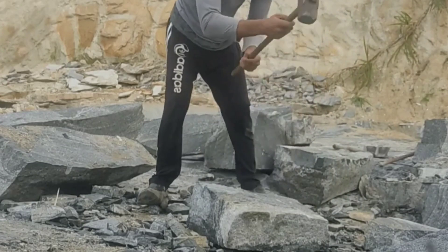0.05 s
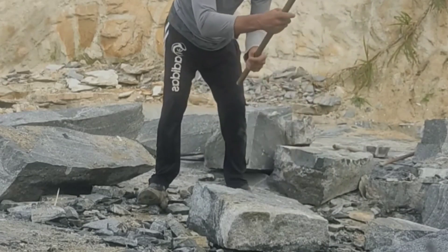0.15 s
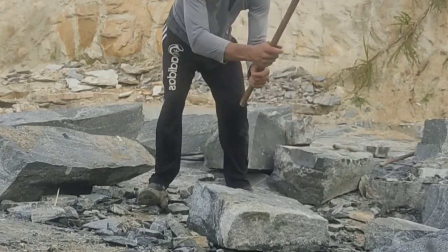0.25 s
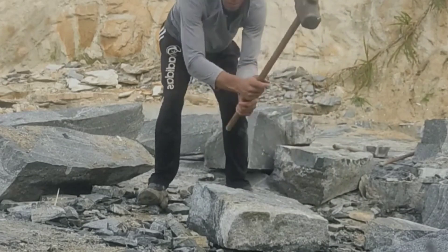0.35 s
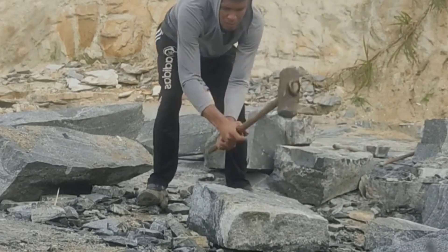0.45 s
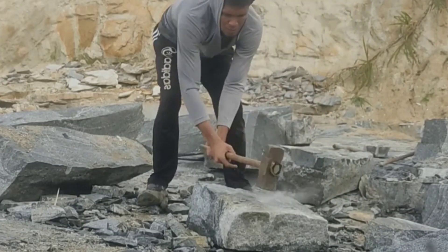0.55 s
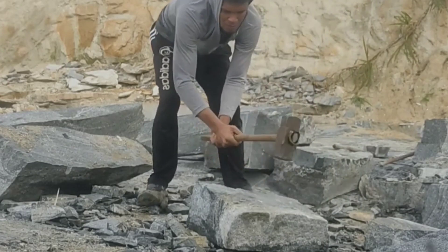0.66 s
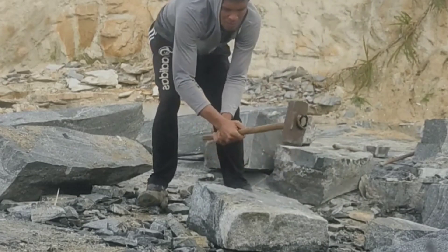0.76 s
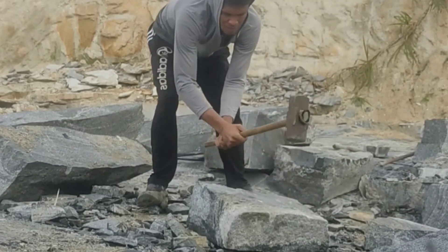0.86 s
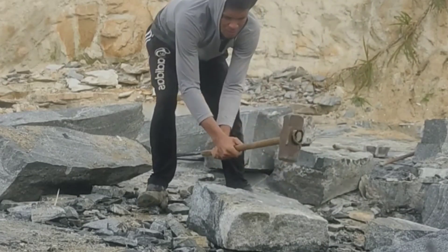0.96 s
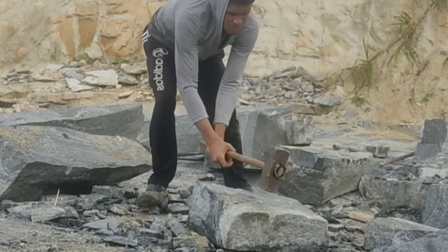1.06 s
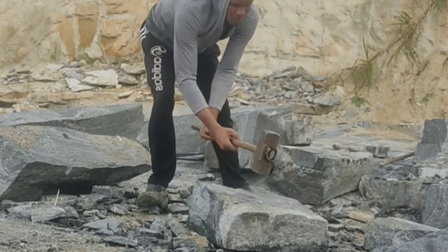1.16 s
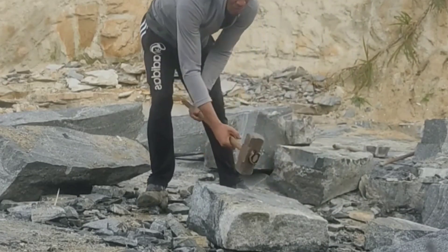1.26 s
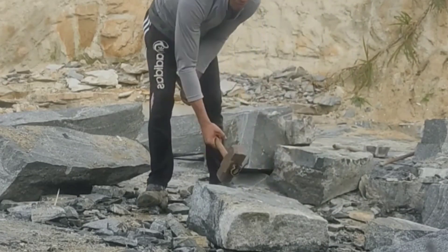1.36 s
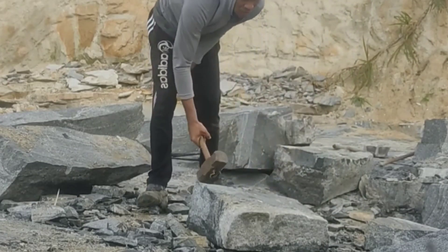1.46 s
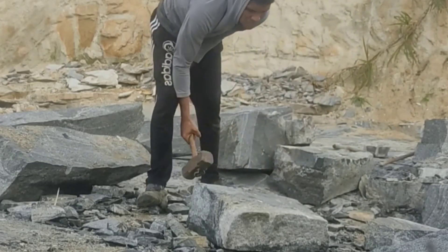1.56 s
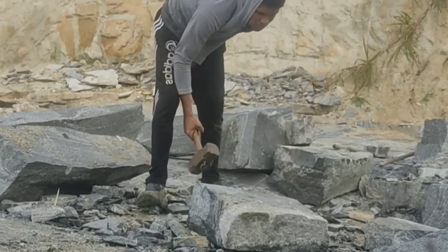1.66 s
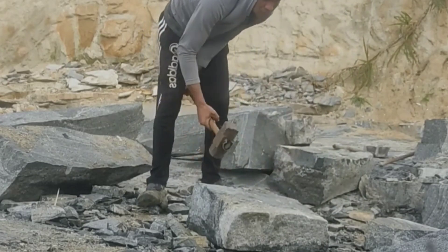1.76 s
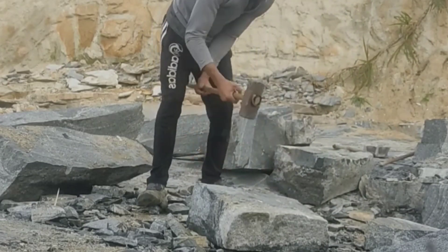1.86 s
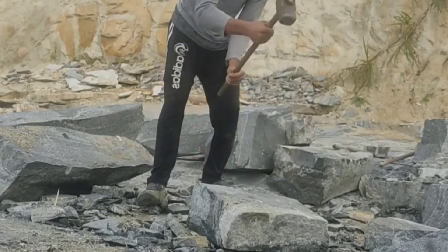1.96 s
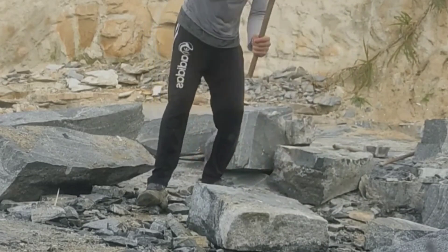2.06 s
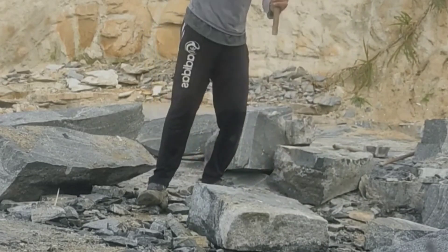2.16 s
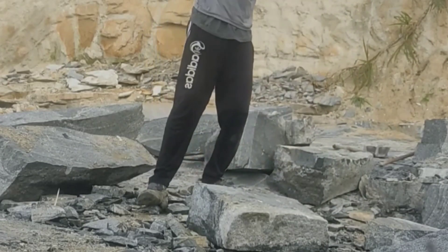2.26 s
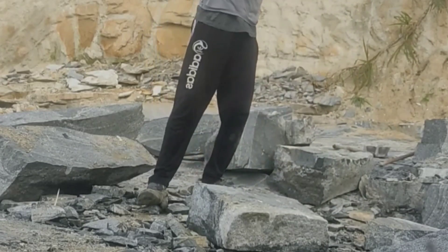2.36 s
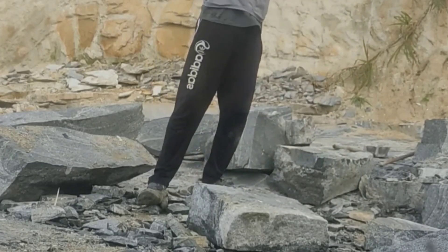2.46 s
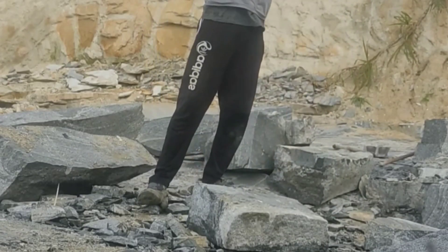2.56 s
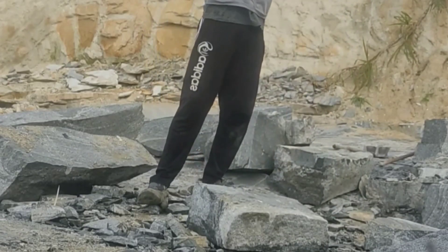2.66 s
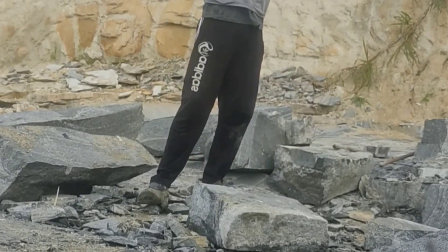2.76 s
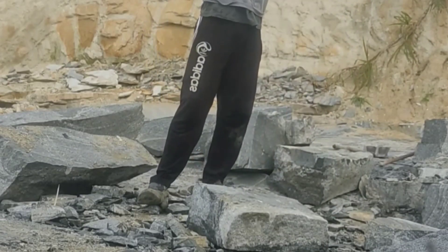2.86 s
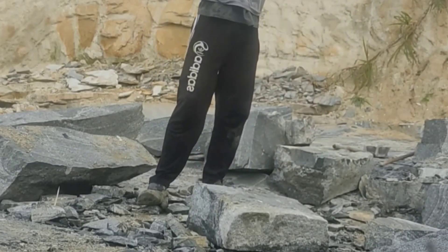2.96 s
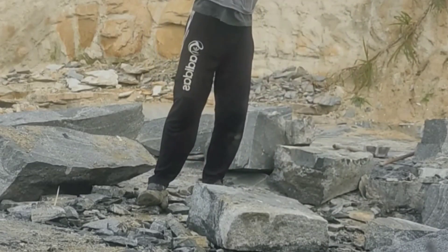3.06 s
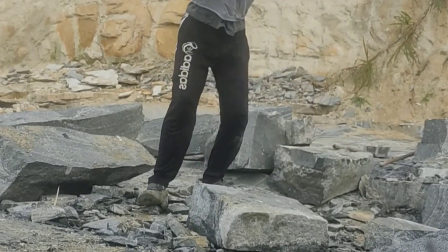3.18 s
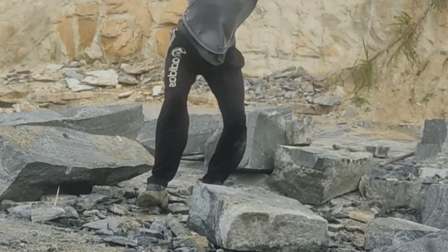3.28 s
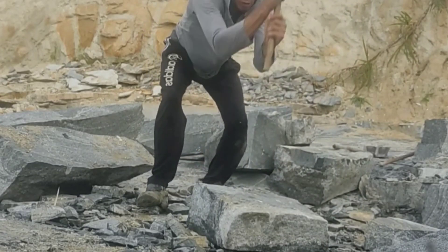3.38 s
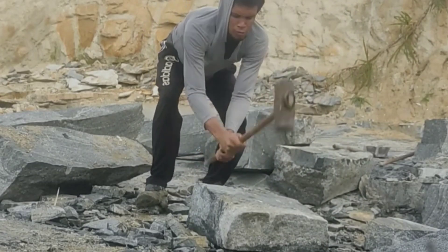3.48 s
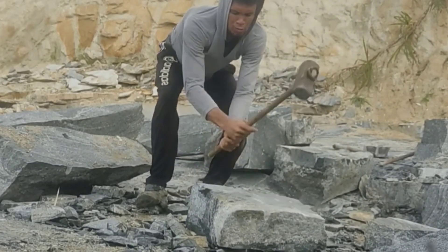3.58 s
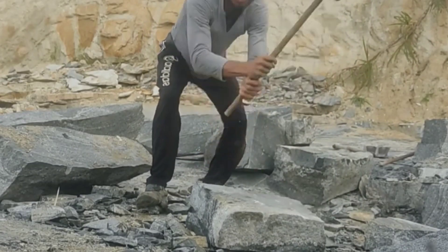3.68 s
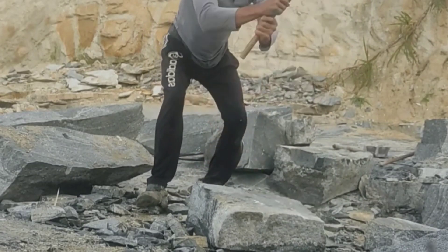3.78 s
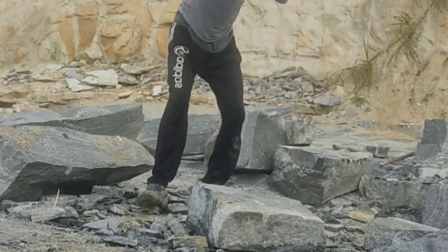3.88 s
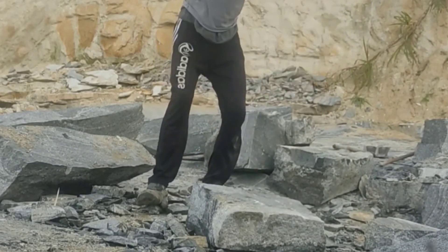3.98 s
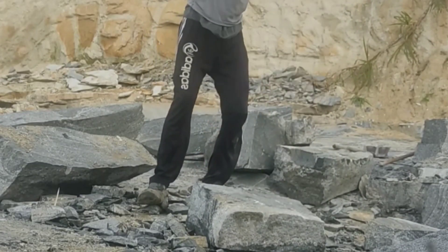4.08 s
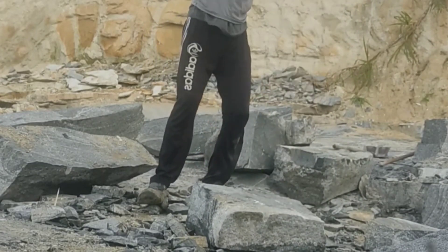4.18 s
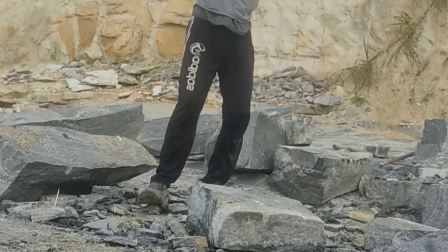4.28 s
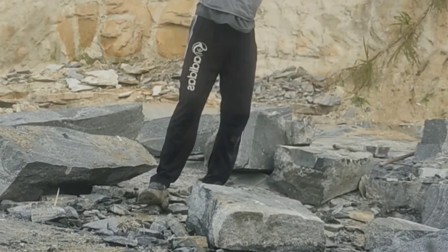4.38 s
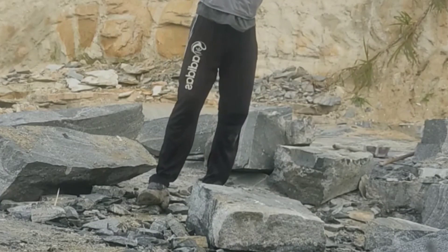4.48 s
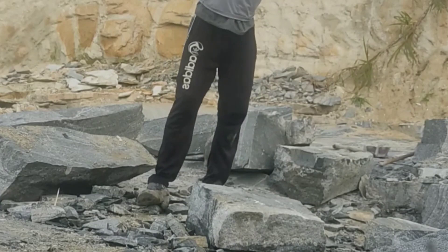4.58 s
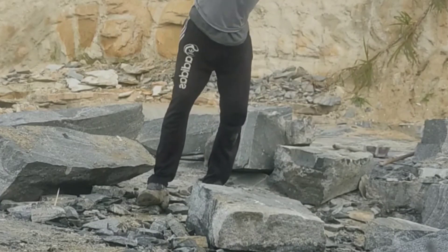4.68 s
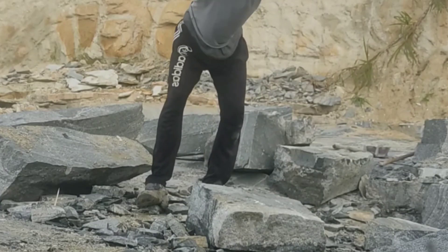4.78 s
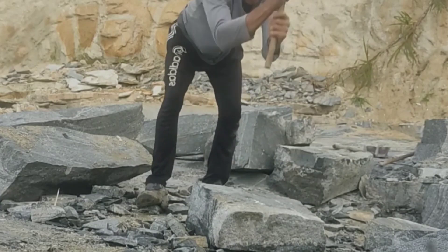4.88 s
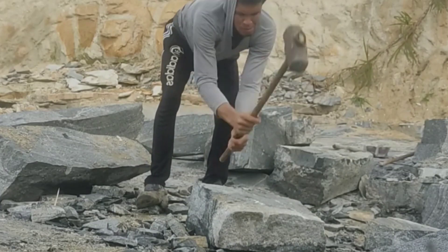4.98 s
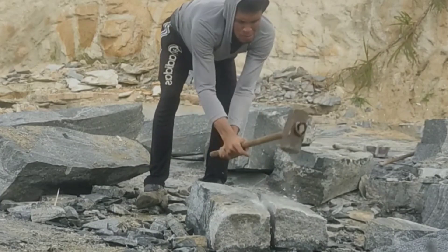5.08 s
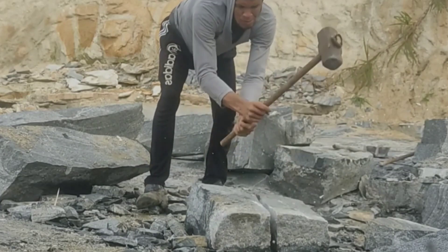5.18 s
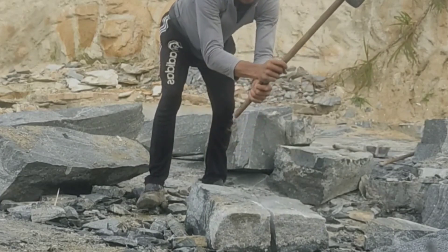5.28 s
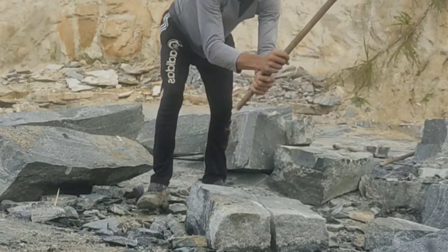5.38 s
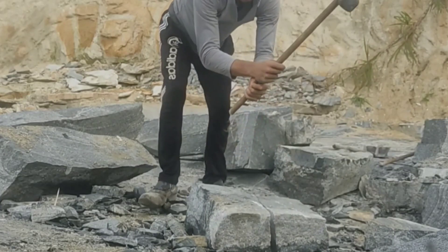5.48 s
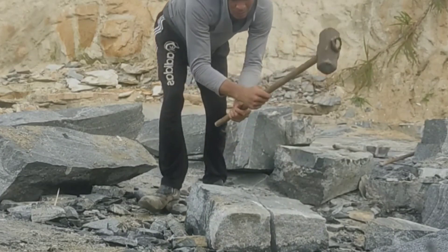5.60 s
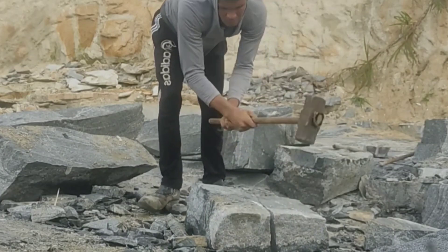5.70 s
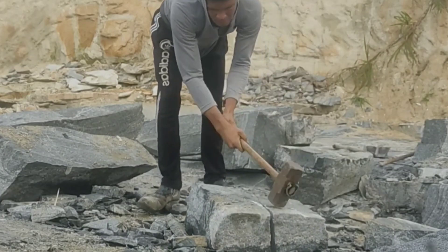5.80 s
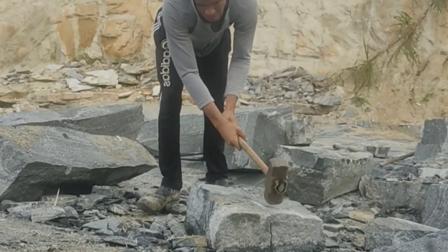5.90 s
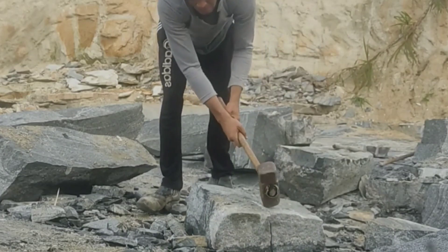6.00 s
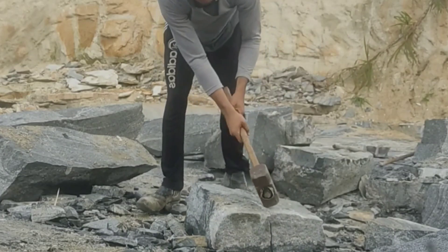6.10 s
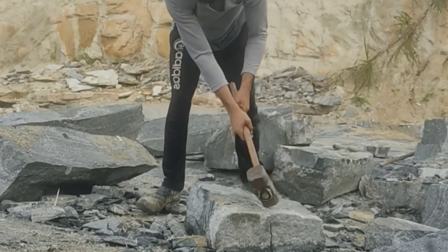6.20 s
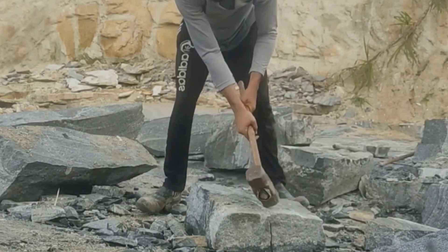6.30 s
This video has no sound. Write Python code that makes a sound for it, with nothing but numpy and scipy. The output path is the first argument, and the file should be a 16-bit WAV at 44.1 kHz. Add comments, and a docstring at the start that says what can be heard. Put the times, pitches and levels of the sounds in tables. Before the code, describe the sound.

Low gusts thump the left side of a stereo microphone while boots grind grit. Two stone blows come half a second apart, the second ringing more, followed by scuffing and a quieter wait. A sharp third blow has a faint bounce and scattering chips. After another pause the fourth rings brightest with steel, then a duller, higher-thudding fifth lands, with a faint thud after. Open quarry, short rock echoes, soft distant birds.

```python
"""A sledgehammer strikes a stone block five times in an open quarry, with two faint following thuds; the block splits.
Each blow sums shaped noise in five registers, decaying modes of block and steel head, and echoes off the rocks.
Chips are short clinks and ticks; boots, clothes and crumbs are grainy noise under slow envelopes.
Wind is low noise, strongest at the left microphone port; the right port hears more treble.
Small far birds are gliding sines blurred by many paths, over a steady air noise."""
import sys
import numpy as np
from scipy import signal
from scipy.fft import rfft, irfft, next_fast_len
from scipy.io import wavfile
from scipy.ndimage import uniform_filter1d

SR = 44100
rng = np.random.default_rng(int(sys.argv[2]) if len(sys.argv) > 2 else 0)


def wav_out(sig):
    """Save sig, one row per channel (or a flat mono array), as 16-bit PCM at SR to the path in sys.argv[1]."""
    wavfile.write(sys.argv[1], SR, np.round(np.clip(np.atleast_2d(sig).T, -1, 1) * 32767).astype(np.int16))


N = 279717

# Event levels are before the trims in the functions. Colours are spectra: each row is Hz, relative dB per Hz.

# Still air. Colour: Hz, dB per Hz.
AIR_COLOUR = [(180, -31.5), (300, -2), (447, -1), (511, -9.5), (814, -5.5), (978, -13.5), (2440, -14.5),
              (2880, -22.5), (5520, -22), (7320, -9), (10600, -27.5), (12300, -32), (16000, -47.5)]
AIR_DB = -70

# Light breeze between gusts. Each row: time in seconds, level in dB.
BREEZE_CURVE = [(0.0, -31.5), (0.12, -51), (0.26, -30), (0.65, -39), (1.16, -40), (1.52, -56),
                (2.61, -39.5), (2.88, -59.5), (5.98, -57.5), (6.34, -71.5)]
BREEZE_TRIM_DB = -2.5
# Gusts. Each row: peak time in seconds, half-length in seconds, level in dB.
GUST_EVENTS = [(0.101, 0.04, -14), (0.218, 0.068, -16.5), (0.464, 0.051, -24), (0.718, 0.041, -33),
               (0.91, 0.085, -30), (1.003, 0.036, -17.5), (1.092, 0.011, -12.5), (1.287, 0.086, -38),
               (1.706, 0.015, -39), (1.81, 0.055, -32.5), (1.97, 0.011, -42), (2.044, 0.015, -36.5),
               (2.234, 0.092, -48.5), (2.447, 0.041, -31), (2.615, 0.023, -33), (2.771, 0.048, -39.5),
               (3.02, 0.059, -55.5), (3.316, 0.012, -39), (3.482, .035, -41.5), (3.797, 0.038, -38.5),
               (3.913, 0.0093, -45), (4.017, 0.013, -43), (4.13, .025, -50.5), (4.372, 0.049, -38.5),
               (4.496, 0.036, -45), (4.59, 0.028, -36.5), (4.96, 0.026, -52.5), (5.072, 0.014, -36),
               (5.402, 0.022, -48.5), (5.586, 0.018, -35), (5.667, 0.012, -34.5)]
GUST_RISE_RATIO, GUST_FALL_RATIO = 0.85, 1.2  # of the half-length
# Sudden eddies. Each row: start in seconds, thump level in dB, flutter level in dB.
EDDY_EVENTS = [(0.069, -4, -22.5), (0.085, -16.5, -10), (0.122, -21, -31), (0.157, -2.5, -22),
               (0.212, -9, -18), (0.249, -5, -30), (0.371, -11.5, -31), (0.429, -11, -40.5),
               (0.563, -15, -59), (0.887, -8.5, -34), (0.919, -12.5, -34), (0.955, -10, -38),
               (1.007, -4, -19), (1.066, -8.5, -16.5), (1.765, -22.5, -46), (2.433, -16, -51),
               (2.46, -22.5, -58.5), (2.608, -17.5, -46), (2.756, -23.5, -65), (4.572, -33.5, -66),
               (5.037, -29, -65.5)]
# Buffeting. Colour: Hz, dB per Hz.
BUFFET_COLOUR = [(90, -7), (130, -1.5), (170, 8), (260, -3.5), (380, -15), (600, -35.5), (1200, -46)]
BUFFET_LOW_HZ, RUMBLE_LOW_HZ = 105, 18
# Deep rumble, eddy thump and eddy flutter. Colours: Hz, dB per Hz.
RUMBLE_COLOUR = [(15, 3), (35, 0.5), (60, 2.5), (110, -5.5)]
THUMP_COLOUR = [(60, -5), (170, 0), (300, -2), (450, -15)]
FLUTTER_COLOUR = [(400, 11.5), (800, -4), (1500, -24.5), (3000, -47)]
# The rumble follows the buffeting sluggishly, with a smaller swing.
RUMBLE_DB, RUMBLE_FOLLOW_RATIO, RUMBLE_BLUR_S = -15, 0.53, 0.071
# Wind with the right port in the lee. Each row: Hz, left minus right in dB.
LEE_BALANCE = [(25, 7), (60, 14), (150, 17), (400, 18), (1300, 25)]

# Port balance for everything but wind. Each row: Hz, left minus right in dB.
PORT_BALANCE = [(100, 11), (400, 2), (1200, 4), (2400, 2), (4200, 2.5), (5400, -7), (6500, -16.5),
                (7800, -19), (10000, -13.5), (15000, -6.5)]
# Port phase: block nearer the right port, delay bent by the microphone body.
# Each row: Hz, left lead in radians.
PORT_PHASE_CURVE = [(100, 0.8), (650, -0.61), (1200, -1.24), (2100, -0.96), (2750, -0.96), (3500, -2),
                    (6500, -3.5), (9000, -1)]

# Far birds. Each row: start in seconds, length in seconds, start Hz, end Hz, arch in Hz, level in dB.
BIRD_CALLS = [(1.96, 0.17, 1460, 1690, 258, -58), (3.982, 0.06, 2587, 2620, 62, -54.5),
              (4.415, 0.1, 8370, 6710, -0.5, -64.5), (4.696, 0.07, 6700, 8200, -2.5, -54),
              (5.524, 0.079, 2480, 2520, 84, -52), (5.771, 0.04, 2420, 2610, 91, -53.5),
              (6.05, 0.054, 2350, 2540, 80, -55.5), (6.168, 0.031, 2350, 2590, 63.5, -63)]

# Scraping and hissing. Colours: Hz, dB per Hz.
SCRAPE_COLOUR = [(240, -38), (400, -4), (474, -3), (1040, -6.5), (1150, -7), (1490, -10), (5010, -12.5),
                 (6000, -14.5), (7800, -41.5), (13200, -120)]
HISS_COLOUR = [(2650, -42.5), (4500, -9.5), (5530, -8.5), (7370, 0.5), (10000, -22), (14500, -29),
               (15500, -42.5), (16000, -65)]
# Clothes rustling through the work. Each row: time in seconds, level in dB.
RUSTLE_CURVE = [(0.0, -66.5), (0.37, -59.5), (1.16, -64), (1.39, -57), (2.42, -70), (3.64, -67),
                (3.78, -56.5), (4.26, -74), (5.14, -73.5), (5.28, -65), (5.9, -62), (6.34, -76.5)]
RUSTLE_SCRAPE_TRIM_DB, RUSTLE_HISS_TRIM_DB = 0.5, 1
# Scuffs of boots, sleeves and hammer head. Each row: peak time in seconds, half-length in seconds,
# scrape level in dB, hiss level in dB, top edge of the scrape in Hz.
SCUFF_EVENTS = [(0.033, .015, -51.5, -55, 4985), (0.114, .06, -33.5, -37.5, 4670),
                (0.228, .04, -39.5, -45.5, 5000), (0.359, 0.017, -57, -53, 4840),
                (0.96, .02, -60, -60, 4930), (1.084, .018, -55, -73, 4030), (1.437, .022, -41.5, -46, 6500),
                (1.505, .06, -41, -42.5, 5170), (1.77, .02, -47, -94, 2270),
                (1.825, .018, -36.5, -81, 2200), (1.879, .02, -39.5, -53, 5220),
                (1.914, .014, -41.5, -58, 4500), (2.331, .025, -47.5, -63.5, 3560),
                (2.6, 0.052, -61.5, -87, 4970), (2.731, 0.052, -62, -72, 5000),
                (3.425, .035, -73, -66.5, 5000), (3.566, .025, -61, -60, 4930),
                (4.14, .03, -63, -71.5, 5000), (5.386, .03, -65, -59, 5000), (5.649, .04, -46, -50, 4000),
                (5.722, .018, -52.5, -61, 2000), (5.866, .04, -62, -68.5, 5050)]
SCUFF_RISE_RATIO, SCUFF_FALL_RATIO = 0.92, 1.22  # of the half-length
SIZZLE_DB = -14  # highest treble of a scuff against its hiss
GRIT_PER_S, GRIT_SPREAD_DB = 410, 3.6
# Stone crumbs underfoot: rate, level against the rustle, spread of sizes, decay.
CRUMBS_PER_S, CRUMB_DB, CRUMB_SPREAD_DB, CRUMB_T60_S = 31, 2, 4, 0.05

# Stone chips landing or shifting. Each row: start in seconds, clink level in dB, tick level in dB.
CHIP_EVENTS = [(0.029, -53, -43.5), (0.352, -63, -47), (0.366, -62, -50), (0.538, -59, -50),
               (0.575, -76, -50.5), (0.7685, -46, -47.5), (1.8837, -55, -42), (2.293, -52.5, -57.5),
               (2.8148, -53, -37.5), (3.132, -57.5, -61), (3.1822, -62.5, -46), (3.403, -60, -48.5),
               (3.8088, -43, -34.5), (3.841, -44.5, -47), (3.923, -41.5, -42), (3.946, -71, -46.5),
               (3.978, -63, -43.5), (4.131, -58, -48), (5.093, -59.5, -60.5), (5.4283, -75, -39.5),
               (6.11, -60.5, -54.5)]

# Hammer blows and faint following thuds. Each row: start in seconds, thud, knock, clack, crack and spit levels
# in dB, length in seconds, first snap in dB, echo in dB, pitch ratio, left minus right in dB,
# ring of the block in dB, ring of the head in dB.
BLOW_EVENTS = [(0.6368, -17.5, -18.5, -20.5, -16.5, -24.5, 0.017, 8, -28.5, 1.015, 2.5, 1, -9),
               (1.1594, -18.5, -19, -24, -29.5, -44.5, 0.016, -3.5, -28, 1.025, -0.5, 13.5, 3.5),
               (3.6203, -16, -18.5, -13, -21.5, -30, 0.017, 4.5, -23, 0.98, -2.5, 2.5, 0.5),
               (3.714, -34.5, -42, -61, -49.5, -70, 0.019, -11, -32, 1.01, -5, -8.5, -6.5),
               (5.1515, -15.5, -18.5, -15.5, -24.5, -31, 0.018, 1, -22, 1.005, 1, 10, 9.5),
               (5.9052, -17.5, -19.5, -29.5, -22, -39.5, 0.019, 5, -29.5, 1.25, 0, 0.5, -3.5),
               (6.036, -32.5, -44, -56, -51, -73, 0.014, -23.5, -27, 1.15, 1, 2, 9.5)]
# Edges of the five registers thud, knock, clack, crack, spit, in Hz.
REGISTER_EDGES_HZ = [130, 950, 2200, 5400, 10000, 17000]
# Impact noise. Colour: Hz, dB per Hz.
CLACK_COLOUR = [(130, -5.5), (240, -8.5), (340, 3), (820, -4.5), (1150, -8), (1800, -10), (2700, -9.5),
                (3300, -12), (5200, -18), (6600, -10), (7800, -11), (9500, -24), (11500, -30),
                (15500, -32.5)]
# Registers, thud to spit: rise in seconds, ratio to the blow length, snap gain.
REGISTER_RISE_S = [0.0055, 0.00069, 0.0024, 0.001, 0.00031]
REGISTER_STRETCH_RATIO = [1.1, 0.93, 0.93, 0.88, 0.84]
REGISTER_SNAP_GAIN = [0.11, 1.5, 1.3, 1.9, 2.2]
# Registers, thud to spit: scatter in dB against the echo level, its decay in seconds, likeness of the ports.
SCATTER_DB = [0.82, -4.5, -6.5, -0.79, -6.5]
SCATTER_T60_S = [0.47, 0.5959, 0.84, 0.71, 0.46]
REGISTER_LIKENESS = [0.39, 0.48, 0.41, 0.86, -1.7]  # noise() clips to -1..1
# Block modes before the pitch ratio, in Hz.
BLOCK_MODES_HZ = [322, 375, 495, 675, 790, 890, 1355, 2190, 2555, 2785, 3515, 4050]
# Ring of each block mode. Each row: level in dB against its register, T60 in seconds.
BLOCK_RING = [(-7, 0.17), (2, 0.12), (2.5, 0.075), (1, .09), (-1.5, 0.058), (-3.5, 0.14), (-8.5, 0.12),
              (-9, 0.055), (-9, 0.044), (-4.5, 0.073), (-10.5, 0.042), (-10, 0.06)]
# Echoes off boulders and walls. Each row: delay in seconds, level in dB, spread in seconds,
# loss in dB per register upwards.
ECHO_PATHS = [(0.047, -1.5, 0.008, -2.5), (0.075, -0.5, 0.0045, 2), (0.099, -7.5, 0.024, 0.5)]
# Two close pitches of the steel head, in Hz.
HEAD_MODES_HZ = [6385, 6512]
HEAD_DB, HEAD_T60_S = [-9.5, -1.5], 0.12  # levels against the crack

CUTOFF_HZ = 15500


def from_db(db):
    """Decibels to amplitude gain."""
    return 10 ** (np.asarray(db) / 20)


def rms_one(x):
    """Scale to unit rms."""
    return x / np.sqrt(np.mean(x ** 2) + 1e-20)


def in_time(rows):
    """Interpolate each column linearly over the scene."""
    s, *columns = np.transpose(rows)
    return [np.interp(np.arange(N) / SR, s, column) for column in columns]


def at_hz(points, hz):
    """Interpolate a curve on a log-frequency axis."""
    points = np.array(points)
    return np.interp(np.log(np.maximum(hz, 1)), np.log(points[:, 0]), points[:, 1])


def pan(db):
    """Left and right gains for a level difference, at constant total power."""
    db = np.atleast_1d(db)
    gains = from_db(np.array([db, -db]) / 2)
    return gains / np.sqrt(np.mean(gains ** 2, axis=0))


def noise(colour, low_hz, high_hz, size, likeness, balance):
    """Stereo noise of a given colour, band edges, port likeness and balance; rms 1."""
    length = next_fast_len(size)
    hz = np.arange(length // 2 + 1) * SR / length + 1e-3
    edges = 1 / np.sqrt((1 + (low_hz / hz) ** 12) * (1 + (hz / high_hz) ** 12))
    mid, side = rfft(rng.standard_normal((2, length)))
    likeness = np.clip(likeness, -1, 1)
    pair = np.sqrt(1 + likeness) * mid + np.sqrt(1 - likeness) * side * [[1], [-1]]
    shaped = pair * edges * from_db(at_hz(colour, hz)) * pan(at_hz(balance, hz))
    return rms_one(irfft(shaped, length)[:, :size])


def evened(x, span_s):
    """Flatten chance swells by the running power, leaving level to the envelope."""
    power = uniform_filter1d(np.mean(x ** 2, axis=0), max(int(span_s * SR), 2))
    return x / np.sqrt(np.maximum(power, 0) + 1e-4)


def flicker(per_s, depth_db):
    """Random gain: normal dB values joined by straight lines."""
    knots = np.arange(N) / SR * per_s
    wander = np.interp(knots, np.arange(N // 10), rng.standard_normal(N // 10))
    return from_db(depth_db * wander)


def dying(t, t60_s):
    """Exponential decay of 60 dB in t60_s."""
    return np.exp(-np.log(1000) * t / t60_s)


def surge(peak_s, rise_s, fall_s):
    """Gaussian swell to height 1, with separate rise and fall."""
    t = np.arange(N) / SR - peak_s
    return np.exp(-np.minimum((t / np.where(t < 0, rise_s, fall_s)) ** 2, 30))


def add(out, start_s, sound):
    """Mix a sound in at a time."""
    at = int(round(start_s * SR))
    out[:, at:at + sound.shape[-1]] += sound[:, :N - at]


def still_air():
    """Steady broadband noise of the open quarry."""
    return from_db(AIR_DB) * noise(AIR_COLOUR, 250, 16000, N, 0.1, PORT_BALANCE)


def wind():
    """Turbulence, mostly at the left port: breeze and gusts drive rumble and buffeting; eddies thump and flutter."""
    breeze_db, = in_time(BREEZE_CURVE)
    power = from_db(breeze_db + BREEZE_TRIM_DB) ** 2
    for peak_s, half_s, level_db in GUST_EVENTS:
        gust = from_db(level_db) * surge(peak_s, GUST_RISE_RATIO * half_s, GUST_FALL_RATIO * half_s)
        power = power + gust ** 2
    slow_db = 10 * np.log10(uniform_filter1d(power, int(RUMBLE_BLUR_S * SR)))
    rumble_db = RUMBLE_DB + RUMBLE_FOLLOW_RATIO * slow_db
    buffet = evened(noise(BUFFET_COLOUR, BUFFET_LOW_HZ, 1800, N, 0.15, LEE_BALANCE), 0.012)
    rumble = evened(noise(RUMBLE_COLOUR, RUMBLE_LOW_HZ, 130, N, 0.077, LEE_BALANCE), 0.11)
    lumps = np.minimum(flicker(60, 3.3), 1.25)
    out = np.sqrt(power) * buffet * lumps + from_db(rumble_db) * rumble

    t = np.arange(SR // 10) / SR
    swell = (t / 0.0063 * np.exp(1 - t / 0.0055)) ** 1.1
    for start_s, thump_db, flutter_db in EDDY_EVENTS:
        thump = evened(noise(THUMP_COLOUR, 48, 450, len(t), 0.1, LEE_BALANCE), 0.01)
        flutter = evened(noise(FLUTTER_COLOUR, 380, 3000, len(t), 0.1, LEE_BALANCE), 0.017)
        eddy = from_db(thump_db - 5.5) * thump + from_db(flutter_db) * flutter
        add(out, start_s, eddy * swell)
    return out


def birds():
    """Jittered sine glides, convolved with decaying noise for the many paths from afar."""
    out = np.zeros((2, N))
    t = np.arange(SR // 10) / SR
    for start_s, length_s, start_hz, end_hz, arch_hz, level_db in BIRD_CALLS:
        u = np.linspace(0, 1, int(length_s * SR))
        glide_hz = start_hz + (end_hz - start_hz) * u + arch_hz * np.sin(np.pi * u)
        hz = glide_hz * flicker(1600, 0.555)[:len(u)]
        call = np.sin(np.pi * u) * np.sin(2 * np.pi * np.cumsum(hz) / SR)
        paths = rms_one(rng.standard_normal((2, len(t))) * dying(t, 0.054)) / np.sqrt(len(t))
        blurred = signal.fftconvolve(call[None], paths, axes=1)
        add(out, start_s, from_db(level_db + 2.5) * pan(at_hz(PORT_BALANCE, start_hz)) * blurred)
    return out


def crumbs():
    """Small stones snap at random under shifting weight, louder with the rustle."""
    rustle_db, = in_time(RUSTLE_CURVE)
    hits = rng.random(N) < CRUMBS_PER_S / SR
    size_db = CRUMB_SPREAD_DB * np.minimum(rng.exponential(1, N), 2.5)
    snaps = hits * from_db(rustle_db + CRUMB_DB + size_db)
    envelope = signal.lfilter([1], [1, -dying(1 / SR, CRUMB_T60_S)], snaps + 1e-12)
    return envelope * noise(SCRAPE_COLOUR, 700, 6000, N, 0.33, PORT_BALANCE)


def grit(per_s, spread_db):
    """Envelope of random decaying grains, a few large among many small; rms 1."""
    hits = rng.random(N) < per_s / SR
    snaps = hits * from_db(spread_db * np.minimum(rng.exponential(1, N), 3.5))
    power = signal.lfilter([1], [1, -np.exp(-1 / (0.0021 * SR))], snaps ** 2 + 1e-9)
    return rms_one(np.sqrt(power + 0.9 * power.mean()))


def scuffs():
    """Grit grinds under boots and cloth slides: scrape and hiss noise, roughened by grains."""
    rustle_db, = in_time(RUSTLE_CURVE)
    hiss = noise(HISS_COLOUR, 5800, 9500, N, 0.1, PORT_BALANCE)
    scrape = noise(SCRAPE_COLOUR, 320, 5600, N, 0.11, PORT_BALANCE)
    out = from_db(rustle_db + RUSTLE_SCRAPE_TRIM_DB) * scrape + from_db(rustle_db + RUSTLE_HISS_TRIM_DB) * hiss
    # only scuffs, not the rustle, reach the highest treble
    brisk = hiss + from_db(SIZZLE_DB) * noise(HISS_COLOUR, 8700, 16000, N, 0.1, PORT_BALANCE)
    for peak_s, half_s, scrape_db, hiss_db, top_hz in SCUFF_EVENTS:
        stroke = surge(peak_s, SCUFF_RISE_RATIO * half_s, SCUFF_FALL_RATIO * half_s)
        out += from_db(hiss_db) * stroke * brisk
        start_s = max(peak_s - 0.25, 0)
        stroke = stroke[int(start_s * SR):][:SR // 2]
        scrape = noise(SCRAPE_COLOUR, 240, top_hz, len(stroke), 0.46, PORT_BALANCE)
        add(out, start_s, from_db(scrape_db) * stroke * scrape)
    return out * grit(GRIT_PER_S, GRIT_SPREAD_DB)


def chips():
    """Flakes land on rubble: a clink of noise and four random pitches, a bright tick, a faint scatter."""
    out = np.zeros((2, N))
    t = np.arange(SR // 8) / SR
    for start_s, clink_db, tick_db in CHIP_EVENTS:
        pitches_hz = rng.uniform(1800, 5500, (4, 1))
        tones = np.sin(2 * np.pi * pitches_hz * t).sum(axis=0)
        body = noise(SCRAPE_COLOUR, 1030, 5500, len(t), 0.076, PORT_BALANCE) + 0.5 * tones
        clink = from_db(clink_db + 3.5) * body * dying(t, 0.046)
        bright = noise(HISS_COLOUR, 4900, 16000, len(t), 0.084, PORT_BALANCE)
        tick = from_db(tick_db + 8) * bright * (dying(t, 0.022) + 0.027 * dying(t, 0.26))
        add(out, start_s, (clink + tick) * (1 - np.exp(-t / 0.00054)))
    return out


def partial(hz, t):
    """One quickly swelling mode, at nearly the same phase in both ports."""
    phase = 2 * np.pi * (hz * t + rng.random() + rng.normal(0, 0.24, (2, 1)))
    return pan(at_hz(PORT_BALANCE, hz)) * np.sin(phase) * (1 - np.exp(-t / 0.0014))


def impact(register_db, length_s, snap_db, echo_db, pitch_ratio, clumps, t):
    """Steel crushes stone: per register a snap, a dense clack and scatter from the rocks."""
    out = np.zeros((2, len(t)))
    for k, level_db in enumerate(register_db):
        clack = np.exp(-(t / (length_s * REGISTER_STRETCH_RATIO[k])) ** 1.5)
        clack += REGISTER_SNAP_GAIN[k] * from_db(snap_db) * dying(t, 0.0011)
        slaps = 0
        for delay_s, slap_db, spread_s, loss_db in ECHO_PATHS:
            slaps = slaps + from_db(slap_db - k * loss_db) * np.exp(-0.5 * ((t - delay_s) / spread_s) ** 2)
        scatter = from_db(echo_db + SCATTER_DB[k]) * np.hypot(dying(t, SCATTER_T60_S[k]), slaps) * clumps
        # the thud of a smaller piece lies higher
        colour = np.array(CLACK_COLOUR) * [pitch_ratio if k == 0 else 1, 1]
        low_hz, high_hz = REGISTER_EDGES_HZ[k], REGISTER_EDGES_HZ[k + 1]
        grain = evened(noise(colour, low_hz, high_hz, len(t), REGISTER_LIKENESS[k], PORT_BALANCE), 0.025)
        rise = 1 - np.exp(-t / REGISTER_RISE_S[k])
        out += from_db(level_db + 3.5) * grain * np.hypot(clack, scatter) * rise
    return out


def block_ring(register_db, pitch_ratio, ring_db, t):
    """Decaying block modes; their pitches rise once it has split."""
    out = np.zeros((2, len(t)))
    for hz, (mode_db, t60_s) in zip(BLOCK_MODES_HZ, BLOCK_RING):
        register = np.searchsorted(REGISTER_EDGES_HZ[1:-1], hz)
        level_db = register_db[register] + mode_db + rng.normal(0, 1)
        # a clean rebound leaves the high modes free to ring
        level_db += ring_db * (hz > REGISTER_EDGES_HZ[2])
        out += from_db(level_db + 0.5) * partial(hz * pitch_ratio, t) * dying(t, t60_s)
    return out


def head_ring(crack_db, echo_db, steel_db, clumps, t):
    """Two close modes of the steel head, prolonged by the rocks."""
    out = np.zeros((2, len(t)))
    fading = dying(t, HEAD_T60_S) + from_db(echo_db + 1) * dying(t, 0.41) * clumps
    for hz, head_db in zip(HEAD_MODES_HZ, HEAD_DB):
        out += from_db(crack_db + head_db + steel_db) * partial(hz, t) * fading
    return out


def hammer():
    """All blows and the faint following thuds: impact noise, block ring and head ring."""
    out = np.zeros((2, N))
    t = np.arange(SR // 2) / SR
    for start_s, *register_db, length_s, snap_db, echo_db, pitch_ratio, side_db, ring_db, steel_db in BLOW_EVENTS:
        clumps = flicker(240, 2)[:len(t)]  # reflections arrive unevenly
        blow = impact(register_db, length_s, snap_db, echo_db, pitch_ratio, clumps, t)
        blow += block_ring(register_db, pitch_ratio, ring_db, t)
        blow += head_ring(register_db[3], echo_db, steel_db, clumps, t)
        add(out, start_s, pan(side_db) * blow)
    return out


def scene():
    """Work sounds with the port phase applied, plus wind, birds and still air."""
    left, right = hammer() + chips() + scuffs() + crumbs()
    length = next_fast_len(N + SR // 10)
    phase = at_hz(PORT_PHASE_CURVE, np.arange(length // 2 + 1) * SR / length)
    left = irfft(rfft(left, length) * np.exp(1j * phase), length)[:N]
    return np.array([left, right]) + wind() + birds() + still_air()


def record(dry):
    """Round peaks off below full scale, then low-pass steeply."""
    rounded = dry / (1 + np.abs(dry) ** 4) ** 0.25
    low_pass = signal.ellip(10, 0.1, 80, CUTOFF_HZ, fs=SR, output="sos")
    return signal.sosfilt(low_pass, rounded)


dry = scene()
out = record(dry)
wav_out(out)
```